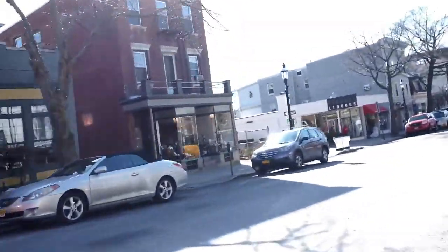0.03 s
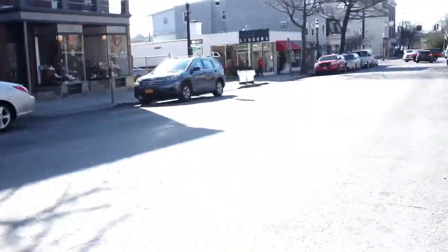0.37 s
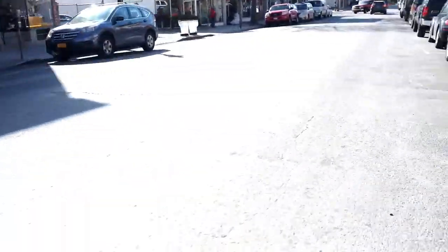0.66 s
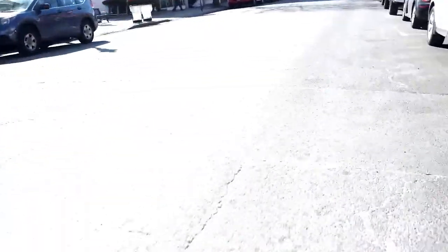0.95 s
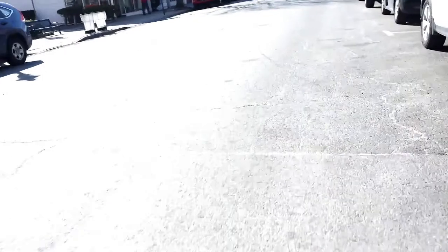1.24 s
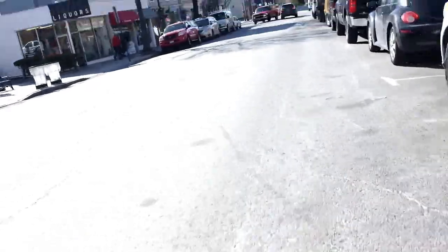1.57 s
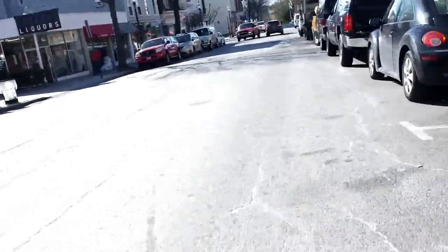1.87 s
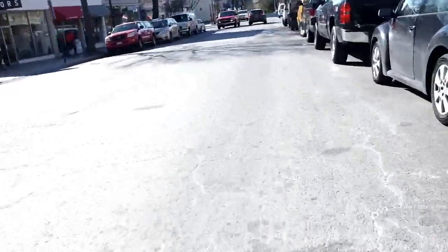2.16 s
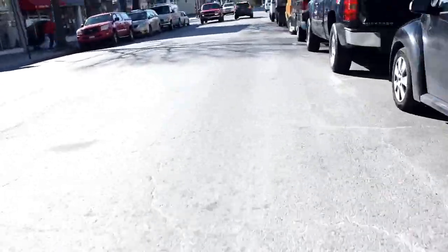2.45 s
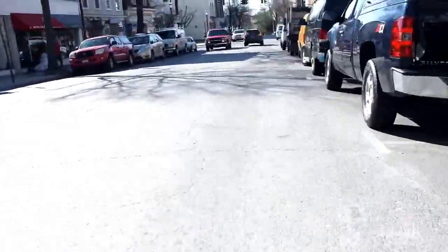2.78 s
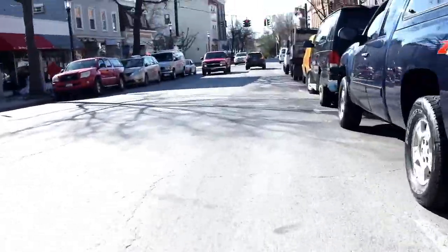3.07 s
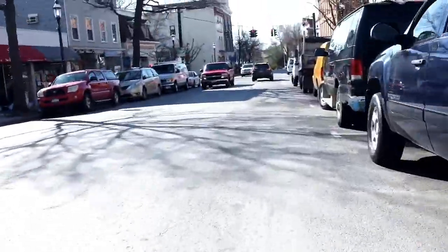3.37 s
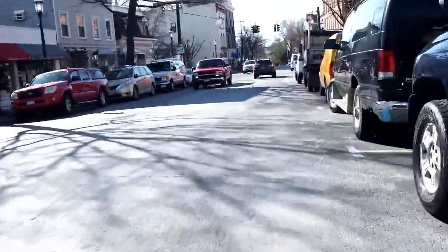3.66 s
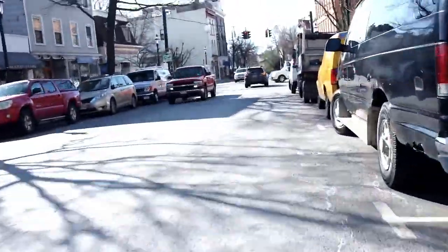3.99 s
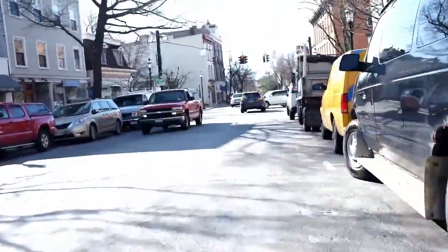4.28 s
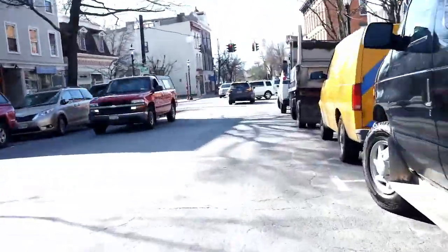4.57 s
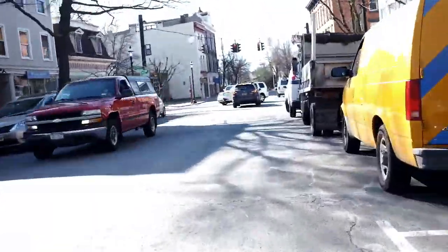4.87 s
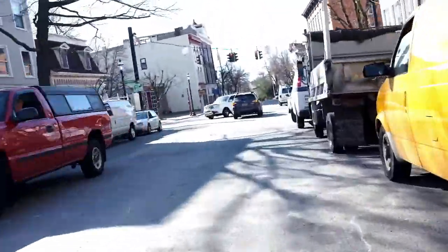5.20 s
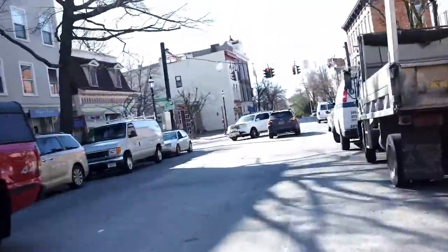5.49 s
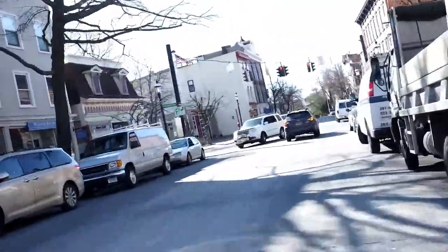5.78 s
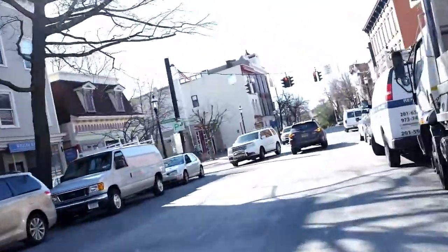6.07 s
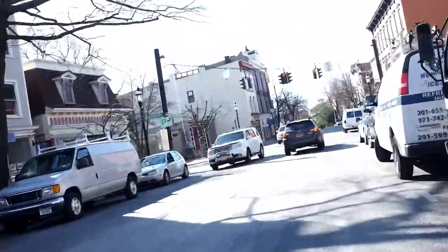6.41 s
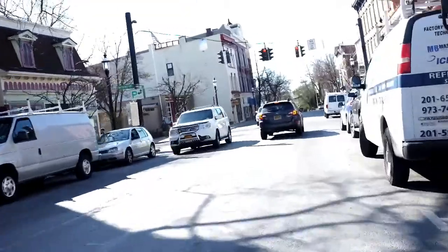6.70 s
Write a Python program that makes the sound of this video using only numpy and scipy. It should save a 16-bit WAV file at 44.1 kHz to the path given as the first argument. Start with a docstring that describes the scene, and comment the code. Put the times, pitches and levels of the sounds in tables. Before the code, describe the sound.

Skateboard wheels drone over coarse pavement close by, the deck knocking on little bumps as gusts softly buffet the microphone.

```python
"""Town street, coarse asphalt: a skateboard rolls steadily, heard from the rider's hand.
Stones drum through the wheels into the deck, rasp the trucks and crunch under the tread.
Sand hisses and loose truck metal chatters; the board knocks and the deck briefly booms.
The airstream buffets the two microphone ports."""
import sys
import numpy as np
from scipy import signal
from scipy.fft import rfft, irfft
from scipy.io import wavfile
from scipy.ndimage import uniform_filter1d

SR = 44100
rng = np.random.default_rng(int(sys.argv[2]) if len(sys.argv) > 2 else 0)


def pcm_store(signal):
    """Save signal as 16-bit PCM."""
    levels = np.round(np.clip(np.atleast_2d(signal), -1, 1) * 32767)
    wavfile.write(sys.argv[1], SR, levels.astype(np.int16).T)


N = 297234

# knocks and brief swells of the rolling board, relative peaks:
# (time [s], deck thump [dB], wheel knock [dB], truck clank [dB], tread tick [dB], length [s])
BUMPS = [(0.087, -23, -20, -30.5, -52, 0.0072), (0.277, -13, -24, -47, -50, 0.0071),
         (0.291, -12, -18, -32, -42, 0.0091), (0.53, -18, -18, -32, -44, 0.0051),
         (0.618, -14, -12, -43, -48, 0.0078), (0.704, -9, -24, -50, -41, 0.005),
         (0.758, -5.5, -26, -37, -43, 0.0037), (0.82, -10, -21, -38, -48, 0.008),
         (0.861, -9, -23, -37, -40, 0.0055), (1.129, -16, -24, -36, -40, 0.004),
         (1.134, -13, -11, -37, -48, 0.0032), (1.173, -14, -23, -30, -37, 0.004),
         (1.226, -14, -28, -44, -49, 0.004), (1.368, -9, -19, -31.5, -40, 0.0055),
         (1.462, -5, -26, -41, -43, 0.0068), (1.6, -9, -18, -37, -45, .005),
         (1.697, -12, -20, -44, -45, 0.012), (1.763, -8, -21, -43, -48, 0.0054),
         (1.848, -7, -24, -34.5, -48, 0.0059), (1.898, -9.5, -14, -37, -37, 0.0064),
         (2.035, -11.5, -23, -35, -38, 0.0066), (2.068, -13, -16, -39, -47, .006),
         (2.135, -21, -27, -46, -50, 0.0056), (2.155, -15, -15, -40, -42, 0.0071),
         (2.175, -5.5, -26, -41, -48, 0.0055), (2.44, -9, -12, -33, -36, .006),
         (2.479, -8, -17, -34, -40, .005), (2.505, -13, -20, -34, -42, 0.0033),
         (2.576, -14, -25, -42, -49, 0.0038), (2.81, -10, -14.5, -30, -40, 0.01),
         (3.043, -6, -25, -40, -47, 0.0061), (3.21, -15, -18, -42, -54, 0.0044),
         (3.37, -19, -25, -42, -50, 0.0057), (3.4, -8.5, -16, -33, -40, 0.0085),
         (3.492, -24, -13, -32, -39, .005), (3.56, -10, -13, -34, -44, .005),
         (3.634, -12, -12.5, -36, -41, 0.0067), (3.702, -17, -15, -39, -44, 0.01),
         (3.782, -5, -15.5, -33, -45, 0.0069), (3.972, -7.5, -20, -42, -46, 0.0051),
         (4.023, -8.5, -24, -36, -43, .005), (4.041, -10, -26, -49, -49, .004),
         (4.219, -20, -18, -36, -44, 0.0055), (4.296, -9.5, -18, -34, -51, 0.0098),
         (4.41, -14, -16, -40, -49, 0.0045), (4.505, -7.5, -23, -48, -50, 0.0056),
         (4.614, -13, -20, -48, -51, 0.0066), (4.691, -5.5, -22, -36, -42, .005),
         (4.784, -8.5, -28, -48, -51, 0.0059), (4.86, -20, -19, -45, -53, 0.0053),
         (4.893, -22, -34, -44, -40, .005), (4.961, -14, -19, -46, -52, 0.0069),
         (5.049, -15, -22, -42, -50, 0.0033), (5.112, -16, -25, -44, -50, 0.0068),
         (5.171, -8, -27, -30, -42, 0.011), (5.186, -30, -28, -38, -42, .005),
         (5.209, -19, -27, -35, -41, .012), (5.246, -11, -24, -41, -52, .004),
         (5.47, -13, -18, -39, -52, 0.0044), (5.664, -18, -12.5, -28, -43, 0.0048),
         (5.728, -22, -21, -38, -48, 0.0055), (5.781, -19, -12.5, -36, -45, 0.01),
         (5.916, -8, -26, -30, -48, 0.0038), (6.011, -7, -16, -37, -52, .006),
         (6.191, -15, -21, -40, -53, .005), (6.244, -7, -16, -34, -44, 0.0099),
         (6.404, -8.5, -19, -41, -53, 0.0092), (6.488, -12, -12, -39, -49, .006),
         (6.583, -9, -18, -31, -44, 0.0068)]
# deck's main ring as the rider leans: (time [s], pitch [Hz], strength [dB])
RING = [(0.05, 590, -3), (0.3, 628, 3.5), (0.65, 639, 5.5), (1.05, 612, 0.5), (1.35, 553, 1.5),
        (2.2, 640, -2.5), (3.1, 608, -21), (3.5, 594, 5.5), (3.78, 585, 6), (4.4, 587, -1.5),
        (4.95, 582, -3.5), (5.35, 657, -7), (5.9, 599, -19), (6.6, 600, -6)]


def from_db(db):
    """Decibels to gain."""
    return 10 ** (np.asarray(db) / 20)


def rms_one(x):
    """Scale to rms 1."""
    return x / np.sqrt(np.mean(x ** 2) + 1e-20)


def in_time(rows):
    """Each column of a timed table, per sample."""
    times, *columns = np.transpose(rows)
    return [np.interp(np.arange(N) / SR, times, column) for column in columns]


def drift(rate_hz):
    """Slow random wander, rms 1."""
    hop, warmup = 20, 4000
    pole = np.exp(-2 * np.pi * rate_hz * hop / SR)
    noise = rng.standard_normal(N // hop + warmup + 2)
    slow = signal.lfilter([1], [1, -2 * pole, pole * pole], noise)[warmup:]
    return np.interp(np.arange(N) / hop, np.arange(len(slow)), rms_one(slow))


def response(body, size=4096):
    """Minimum-phase ring of a (Hz, dB) spectrum, falling 24 dB/octave above it."""
    hz, db = np.transpose(body)
    bins_hz = np.maximum(np.arange(size // 2 + 1) * SR / size, 1)
    rolloff_db = 24 * np.maximum(np.log2(bins_hz / hz[-1]), 0)
    shape_db = np.interp(np.log(bins_hz), np.log(hz), db) - rolloff_db
    cepstrum = irfft(np.log(from_db(shape_db)))
    cepstrum[1:size // 2] *= 2
    cepstrum[size // 2 + 1:] = 0
    return irfft(np.exp(rfft(cepstrum)))


def through(x, body):
    """Filter by a body's spectrum."""
    return signal.oaconvolve(x, response(body))[:N]


def steady(x, size=2400):
    """Hold the running rms at 1, keeping the fine grain."""
    power = uniform_filter1d(uniform_filter1d(x ** 2, size), size // 2)
    return x / np.sqrt(np.maximum(power, 1e-20))


def part(body, road, gain, jolts, scatter_db, pan_db, lag_s, boom=0):
    """A board part shaken by road and jolts, at both ports; the left lags."""
    jolts = jolts / np.abs(response(body)).max()
    direct = gain * steady(through(road, body)) + through(jolts, body) + boom
    # street and rider scatter the sound differently to each port
    envelope = np.sqrt(np.maximum(uniform_filter1d(direct ** 2, size=120), 0))
    scatter = np.array([rms_one(through(rng.standard_normal(N), body)) for _ in range(2)])
    taps = np.arange(-16, 17)
    late = np.convolve(direct, np.sinc(taps - lag_s * SR) * np.hanning(len(taps)), "same")
    ports = np.array([late, direct]) + from_db(scatter_db) * scatter * envelope
    return ports * from_db([[pan_db / 2], [-pan_db / 2]])


def stones(per_s, spread_db):
    """Random stone contacts: many small, a few large."""
    sizes = from_db(spread_db * np.minimum(rng.exponential(1, N), 4))
    return sizes * rng.choice([-1, 1], N) * (rng.random(N) < per_s / SR)


def deck_flex(rate_hz):
    """Uneven flexing under the rider, rms 1."""
    band = signal.butter(2, [rate_hz / 2, rate_hz * 2], "band", fs=SR, output="sos")
    return rms_one(signal.sosfilt(band, rng.standard_normal(N + SR))[SR:])


def wheel_turns(rate_hz, spread_hz):
    """Uneven wheels pulse once a turn, -1 to 1."""
    return np.sin(2 * np.pi * np.cumsum(rate_hz + spread_hz * drift(2.7)) / SR)


def deck_hum(road, width_hz, wander_hz):
    """Road shaking, lifted at the deck's main ring; weight shifts bend the pitch."""
    hz, boost_db = in_time(RING)
    hz = hz + wander_hz * drift(10.5)
    phasor = np.exp(2j * np.pi * np.cumsum(hz) / SR)
    pole = np.exp(-np.pi * width_hz / SR)
    # shifted to 0 Hz, the ring is a plain decay
    decay = signal.lfilter([1 - pole], [1, -pole], road / phasor + 1e-18)
    ring = 2 * (phasor * decay).real
    return road + from_db(boost_db) * ring


def deck_drone(road, level_db, times, thump_db, length_s, flex_db=0.56, turn_db=1.2):
    """The hollow deck drones with the road; a bump gives a sharp blow and a boom."""
    # deck response: (frequency [Hz], gain [dB])
    body = [(30, -58), (80, -36.5), (140, -26.5), (210, -17.5), (280, -11), (320, -8), (375, -11.5),
            (430, -9), (500, 1), (570, -1), (650, 0.5), (720, -4.5), (860, -25), (1500, -43.5)]
    level_db = level_db + flex_db * deck_flex(rate_hz=7.2)
    level_db += turn_db * wheel_turns(rate_hz=45, spread_hz=2.26)
    shaking = deck_hum(road, width_hz=16, wander_hz=22.3)
    jolts = knocks(times, thump_db - 7, length_s, crunch=0.24)
    boom = deck_booms(times, thump_db - 1, length_s)
    return part(body, shaking, from_db(level_db), jolts,
                scatter_db=-42, pan_db=0.06, lag_s=5.7e-5, boom=boom)


def wheel_roar(road, growl_db, whirr_db, times, knock_db, length_s):
    """Stones drum the wheels: a growl and a higher whirr."""
    # wheel responses: (frequency [Hz], gain [dB])
    low = [(500, -36), (680, 0.5), (760, 5), (850, 8), (920, 2.5), (1050, -22)]
    high = [(780, -24), (930, -0.5), (1030, 3), (1110, -1.5), (1190, -1.5), (1300, -11), (1420, -21),
            (2000, -33)]
    jolts = knocks(times, knock_db - 3.5, 0.86 * length_s, crunch=0.98)
    growl = part(low, road, from_db(growl_db), jolts, scatter_db=-41, pan_db=-1.5, lag_s=2e-6)
    whirr = part(high, road, from_db(whirr_db), jolts, scatter_db=-20, pan_db=-0.5, lag_s=2e-6)
    return growl + whirr


def truck_rasp(road, level_db, times, clank_db, length_s):
    """The trucks rasp on stones and clank on bumps."""
    # truck response: (frequency [Hz], gain [dB])
    body = [(900, -19), (1350, -10.5), (1550, 5.5), (1750, 2), (2100, -0.5), (2215, 2), (2330, -5.5),
            (2500, -8.5), (2750, -19.5), (3000, -18), (3500, -25.5), (5000, -34)]
    jolts = knocks(times, clank_db, length_s, crunch=1.8)
    return part(body, road, from_db(level_db), jolts, scatter_db=-7.5, pan_db=2, lag_s=2e-6)


def tread_scrape(grain, patches, level_db, times, tick_db, length_s):
    """Fine grain and sharp grit crunch under the tread."""
    # tread response: (frequency [Hz], gain [dB])
    body = [(2000, 5), (3050, 9.5), (3600, 3), (4000, 3), (4400, 5), (5000, 1.5), (5900, 2.5), (6400, 4),
            (7000, 2), (7800, 0.5), (9000, -8), (15000, -62)]
    grit = 2.8 * stones(per_s=110, spread_db=3.6)
    road = (grain + grit) * from_db(1.34 * patches)
    jolts = knocks(times, tick_db, 0.67 * length_s, crunch=4.1)
    return part(body, road, from_db(level_db), jolts, scatter_db=0.5, pan_db=1, lag_s=6.7e-5)


def sand_hiss(road, gain_db, times, tick_db, length_s):
    """Loose sand hisses under the tread."""
    # hiss spectrum: (frequency [Hz], gain [dB])
    body = [(3000, -20), (7000, -13), (8000, -6), (8600, 2), (9400, 0), (10700, -1), (11700, -3.5),
            (13300, -10), (14400, -12), (15600, -16.5)]
    # hiss at mean coarseness: (time [s], level [dB])
    sand_level = [(0.05, -59), (0.5, -57), (1.3, -57.5), (2.15, -57.5), (2.45, -55.5), (2.65, -59),
                  (3.5, -56.5), (4.0, -58.5), (5.05, -56.5), (5.2, -57.5), (5.4, -59), (6.0, -58),
                  (6.6, -56.5)]
    level_db, = in_time(sand_level)
    jolts = knocks(times, tick_db - 8, 0.82 * length_s, crunch=4.3)
    return part(body, road, from_db(level_db + gain_db), jolts, scatter_db=0.5, pan_db=-1, lag_s=7e-6)


def truck_chatter(level_db, times, bump_db, spread_db=2.2):
    """Stones and bumps ring the trucks' loose metal, in a new mix each time."""
    # metal modes: (frequency [Hz], gain [dB], t60 [s])
    metal_modes = [(1590, -1, 0.017), (2100, -6, 0.012), (2224, -1, 0.023), (2400, -7.5, 0.012)]
    jolts = stones(per_s=45, spread_db=1.5) * from_db(level_db)
    jolts[(times * SR).astype(int)] += from_db(bump_db)
    out = 0
    for hz, db, t60_s in metal_modes:
        pole, angle = from_db(-60 / (t60_s * SR)), 2 * np.pi * hz / SR
        drive = jolts * from_db(db + spread_db * rng.standard_normal(N)) + 1e-18
        out += signal.lfilter([0, np.sin(angle)], [1, -2 * pole * np.cos(angle), pole * pole], drive)
    return out


def eddies(spectrum, lumps_db):
    """Lumpy turbulence, separate on each port."""
    ports = [rng.standard_normal(N) * from_db(lumps_db * drift(88)) for _ in range(2)]
    return np.array([steady(through(noise, spectrum), size=6000) for noise in ports])


def wind(gust_hz=11.6, gust_db=0.5, sway_db=4.5, moderate_db=-40):
    """Gusts rumble on the ports; stronger air flutters more."""
    # airstream: (time [s], relative level [dB], left minus right [dB])
    airstream = [(0.15, -44, -9), (0.5, -55.5, 6), (1.56, -56, 14), (1.64, -46.5, 30), (1.95, -41.5, 14.5),
                 (2.38, -35, 1), (2.5, -45.5, 0), (2.62, -36.5, 7.5), (2.82, -41.5, 12), (2.92, -31, 7.5),
                 (3.5, -31.5, 5.5), (3.7, -37.5, 6), (4.1, -39.5, 10.5), (4.55, -28.5, 2),
                 (4.78, -38, -10.5), (4.98, -31.5, 1), (5.18, -39, -6), (5.23, -31, -8), (5.35, -33.5, -7),
                 (5.7, -37, 8), (6.65, -42.5, 5)]
    # big slow eddies, small quick ones: (frequency [Hz], gain [dB])
    rumble = [(12, -27), (28, -5.5), (45, -4), (65, 2), (100, 4), (180, -4.5), (300, -12.5), (600, -16),
              (2000, -56)]
    flutter = [(40, -20), (110, -6), (190, 0), (300, -2.5), (500, -7), (900, -14), (1600, -27), (3000, -46)]
    level_db, lean_db = in_time(airstream)
    level_db += gust_db * drift(gust_hz)
    lean_db += sway_db * drift(gust_hz)
    flutter_db = 4.5 + 0.17 * (level_db - moderate_db)
    air = eddies(rumble, lumps_db=1) + from_db(flutter_db) * eddies(flutter, lumps_db=4.5)
    return air * from_db(level_db - 1 + np.array([lean_db, -lean_db]) / 2)


def bumps(pebbles_per_s=5, spread_db=5.5, length_s=0.0082):
    """BUMPS plus small random pebbles, same columns."""
    # mean small pebble: (thump [dB], knock [dB], clank [dB], tick [dB])
    pebble_db = (-15, -24.5, -50, -52)
    draws = rng.random((200, 2))
    times = np.cumsum(-np.log(1 - draws[:, 0])) / pebbles_per_s
    size_db = spread_db * (2 * draws[:, 1:] - 1)
    pebbles = np.column_stack([times, size_db + np.array(pebble_db), np.full(len(times), length_s)])
    return np.vstack([BUMPS, pebbles[times < N / SR]])


def wheel_load_db(lift_db, lift_s, lead_s):
    """The rolling level dips briefly around each knock in BUMPS."""
    lifts = np.array(BUMPS)[:, 0] - lead_s
    t = np.arange(N) / SR
    nearest = lifts[np.searchsorted((lifts[1:] + lifts[:-1]) / 2, t)]
    return lift_db * np.exp(-((t - nearest) / lift_s) ** 2)


def knocks(times, peaks_db, lengths_s, crunch):
    """One blow per bump, then a brief crunch as the wheel settles."""
    blows, settling = np.zeros((2, N + SR))
    t = np.arange(SR // 10) / SR
    for time_s, peak, length_s in zip(times, from_db(peaks_db), lengths_s):
        start = round(time_s * SR) + SR // 1000
        blows[start] += peak
        settling[start:start + len(t)] += peak * np.exp(-t / length_s) * np.sqrt(2 / (length_s * SR))
    return (blows + crunch * settling * rng.standard_normal(N + SR))[:N]


def deck_booms(times, peaks_db, lengths_s, spread_hz=46, rise_share=0.49):
    """On each bump the deck's ring swells and dies, slightly detuned."""
    out, t = np.zeros(N + SR), np.arange(SR // 10) / SR
    ring_hz, _ = in_time(RING)
    for time_s, peak, length_s in zip(times, from_db(peaks_db), lengths_s):
        start, age = int(time_s * SR), t / (rise_share * length_s)
        hz = ring_hz[start] + spread_hz * rng.standard_normal()
        out[start:start + len(t)] += peak * age * np.exp(1 - age) * np.sin(2 * np.pi * hz * t)
    return out[:N]


def board(patch_db=0.5, patch_hz=4.4):
    """One road shakes all parts; wheels, trucks and grit follow its coarseness more than the deck."""
    # asphalt coarseness: (time [s], offset from mean [dB])
    asphalt = [(0.05, 0), (0.22, -0.5), (0.3, 0), (0.42, 2.2), (1.2, 0), (1.32, 2.5), (1.5, -2.6),
               (1.62, 1.5), (1.8, 0.5), (1.92, 0), (2.15, 3.5), (2.45, 0), (2.55, 0), (2.85, 2.5),
               (3.1, -1), (3.33, -4.5), (3.47, -1.5), (3.76, 1), (3.83, -1), (3.93, -3.5), (4.0, -1.5),
               (4.22, 0), (4.48, -3.5), (4.75, -1), (5.06, 1), (5.15, 0.5), (5.19, 2.5), (5.28, 1),
               (5.48, 1.3), (5.58, 0.5), (5.85, 2), (6.35, -1.5), (6.6, -1.8)]
    # levels at mean coarseness: (time [s], deck [dB], growl [dB], whirr [dB], rasp [dB], scrape [dB])
    ride = [(0.05, -17, -21.5, -24, -42.5, -54), (0.45, -15.5, -27, -28, -41.5, -53),
            (0.85, -17.5, -25, -28.5, -42.5, -52), (1.2, -17, -20.5, -28.5, -44.5, -51.5),
            (1.65, -17.5, -23, -27, -45.8, -51), (2.2, -18, -27.5, -29, -47, -53),
            (2.52, -17, -22, -28, -46, -50.5), (2.9, -18.5, -27.5, -31, -49, -54),
            (3.3, -18.5, -23, -26, -43, -51), (3.55, -18, -24.5, -30, -45.5, -53),
            (4.05, -18, -24.5, -28, -47.5, -52.5), (4.58, -20, -26.5, -28.5, -47, -53.5),
            (4.8, -17, -27.5, -29, -45, -51.5), (5.5, -17.5, -26, -29, -46, -55),
            (5.75, -17, -26.5, -27.5, -44.5, -52), (6.15, -17.5, -25, -27.5, -50, -54),
            (6.5, -17, -27.3, -24, -44.5, -52)]
    deck_db, growl_db, whirr_db, rasp_db, scrape_db = in_time(ride)
    times, thump_db, knock_db, clank_db, tick_db, length_s = bumps().T
    stone = stones(per_s=2400, spread_db=1.5)
    grain = stones(per_s=12000, spread_db=2.5)
    patches = drift(32)
    coarse_db = in_time(asphalt)[0] + patch_db * drift(patch_hz)
    load_db = wheel_load_db(lift_db=-0.5, lift_s=0.0079, lead_s=0.003)
    deck_db += 0.26 * coarse_db + load_db
    wheel_db = 0.88 * coarse_db + load_db
    truck_db, grit_db = 0.78 * coarse_db, 0.91 * coarse_db
    wheel_road = stone * from_db(1.87 * patches)
    truck_road = (stone + 0.37 * grain) * from_db(2.5 * patches)
    return (deck_drone(stone + 0.51 * grain, deck_db, times, thump_db, length_s)
            + wheel_roar(wheel_road, growl_db + wheel_db, whirr_db + wheel_db, times, knock_db, length_s)
            + truck_rasp(truck_road, rasp_db + truck_db + load_db, times, clank_db, length_s)
            + tread_scrape(grain, patches, scrape_db + grit_db, times, tick_db, length_s)
            + sand_hiss(grain * from_db(1.4 * patches), grit_db, times, tick_db, length_s)
            + truck_chatter(truck_db - 43.5, times, clank_db - 12))


def scene():
    """Rolling board plus airstream."""
    return board() + wind()


def record(dry):
    """Steep low-pass."""
    cutoff_hz = 15700
    return signal.sosfilt(signal.ellip(12, .1, 90, cutoff_hz, fs=SR, output="sos"), dry)


dry = scene()
out = record(dry)
pcm_store(out)
```